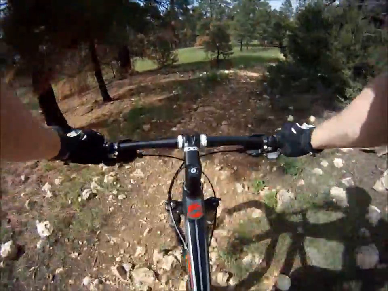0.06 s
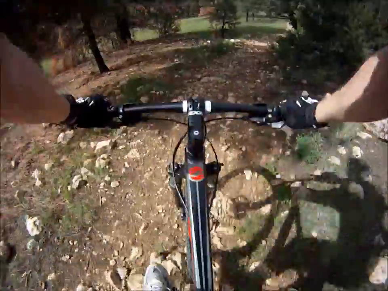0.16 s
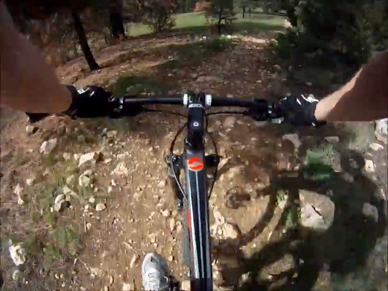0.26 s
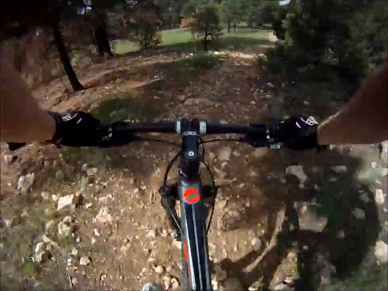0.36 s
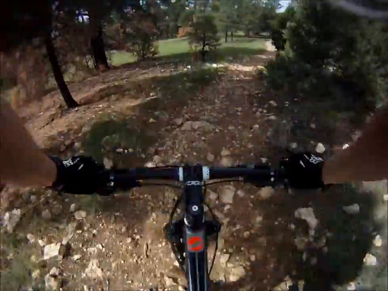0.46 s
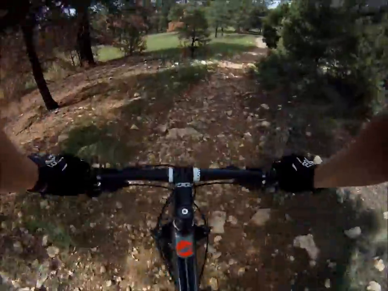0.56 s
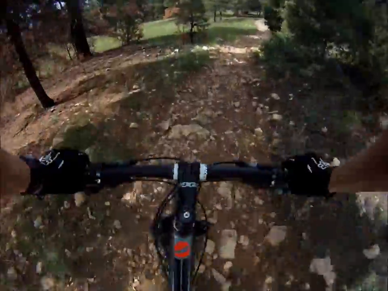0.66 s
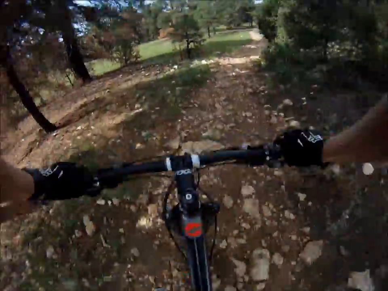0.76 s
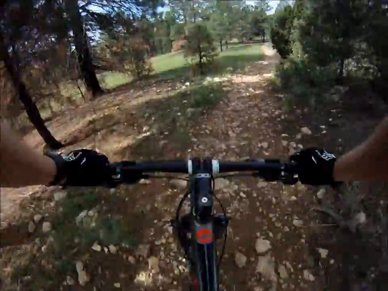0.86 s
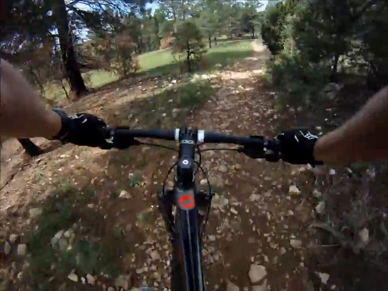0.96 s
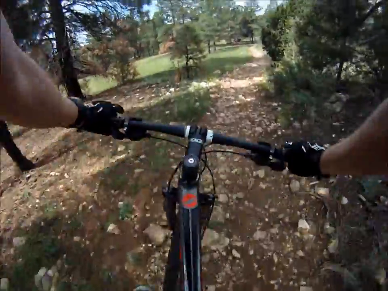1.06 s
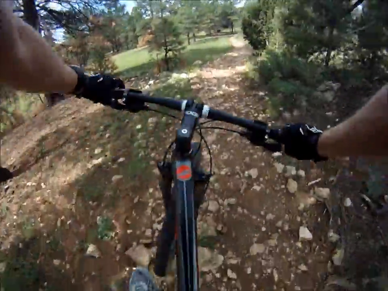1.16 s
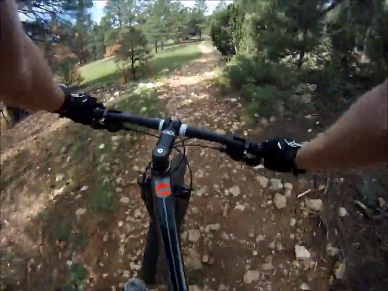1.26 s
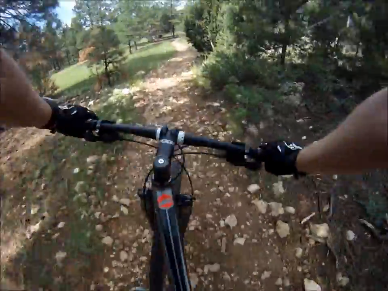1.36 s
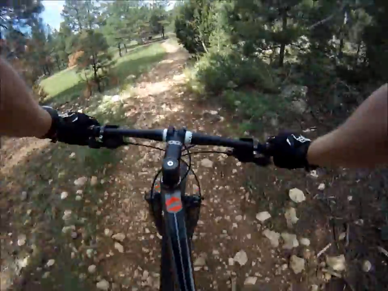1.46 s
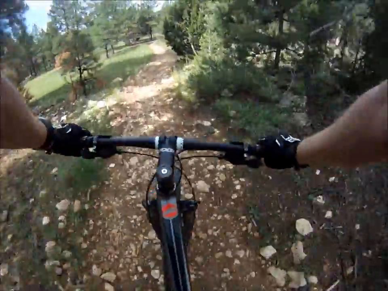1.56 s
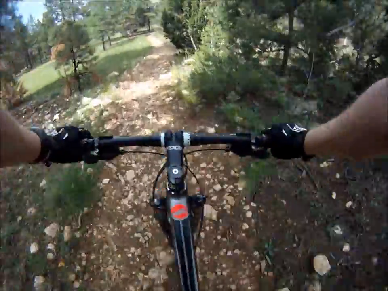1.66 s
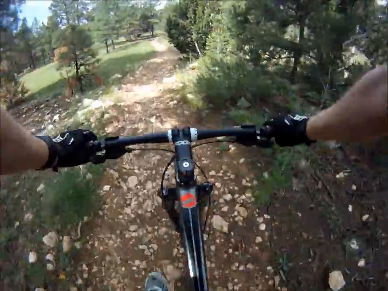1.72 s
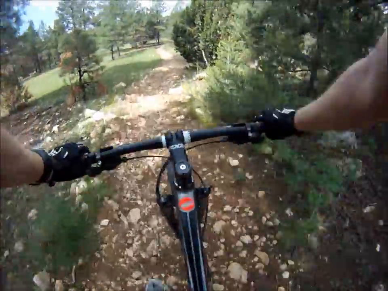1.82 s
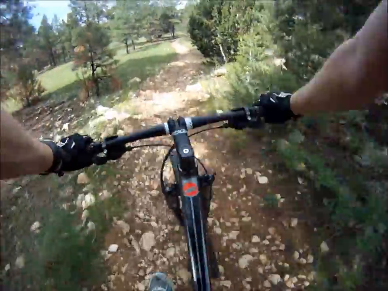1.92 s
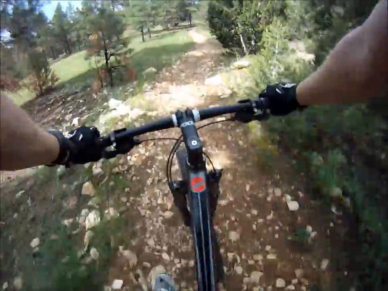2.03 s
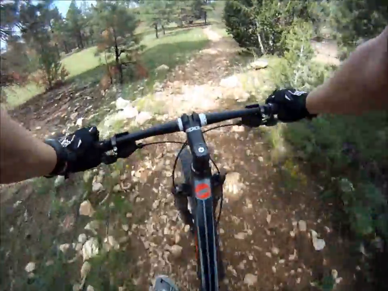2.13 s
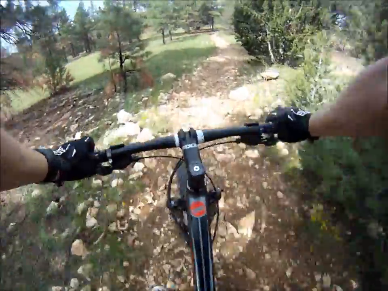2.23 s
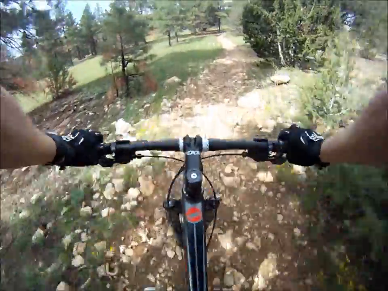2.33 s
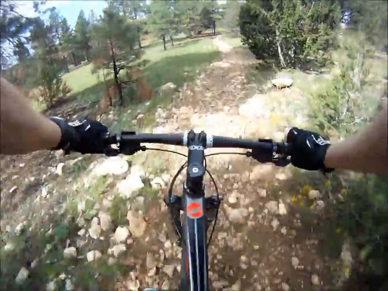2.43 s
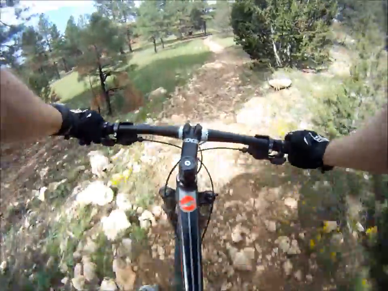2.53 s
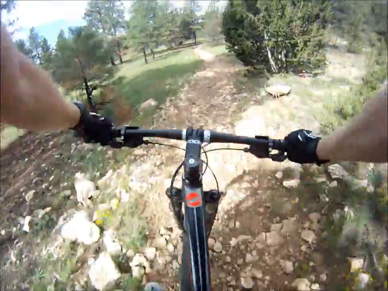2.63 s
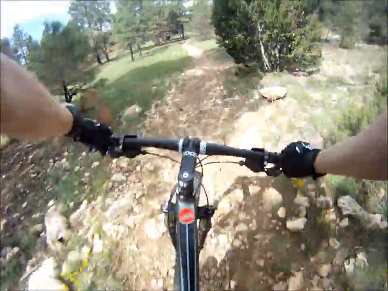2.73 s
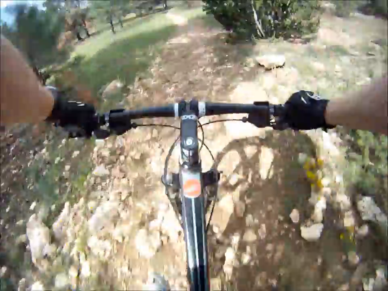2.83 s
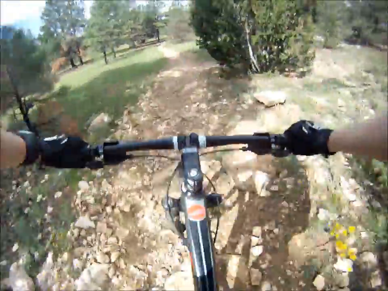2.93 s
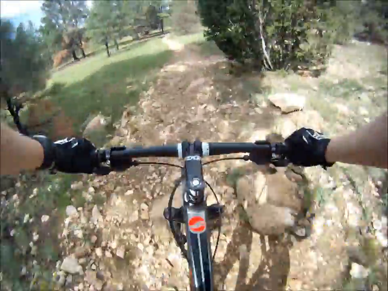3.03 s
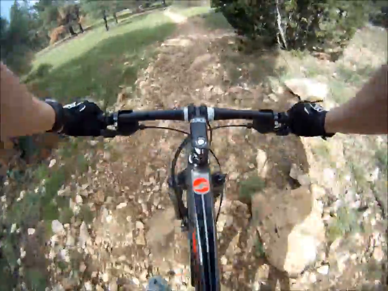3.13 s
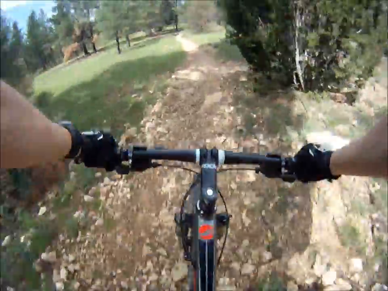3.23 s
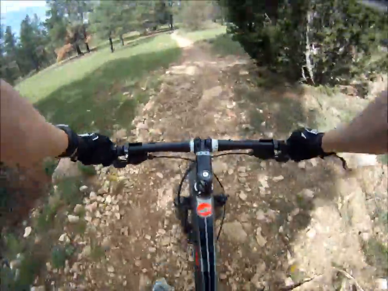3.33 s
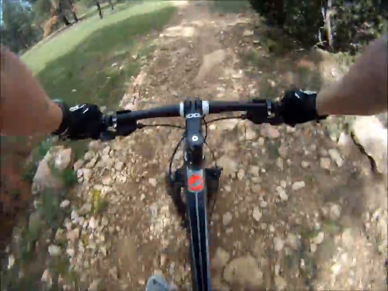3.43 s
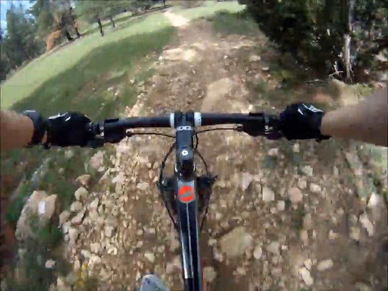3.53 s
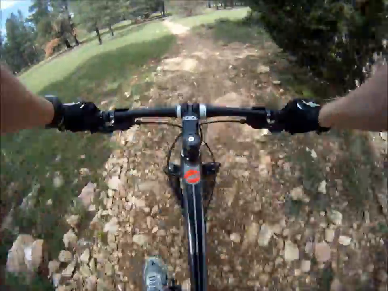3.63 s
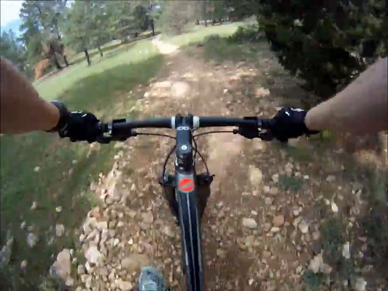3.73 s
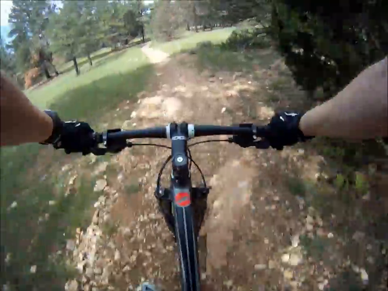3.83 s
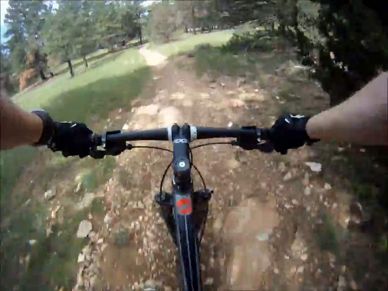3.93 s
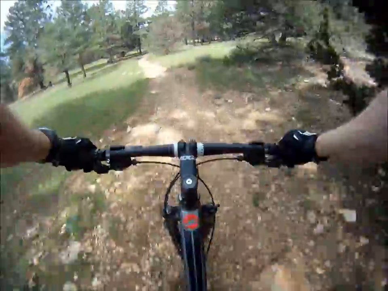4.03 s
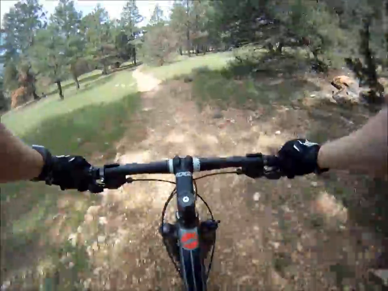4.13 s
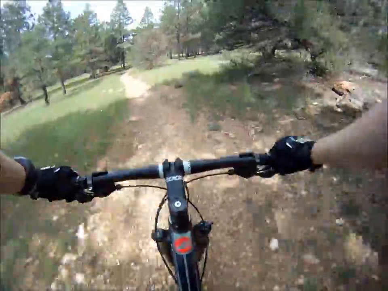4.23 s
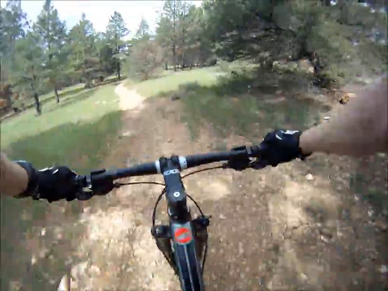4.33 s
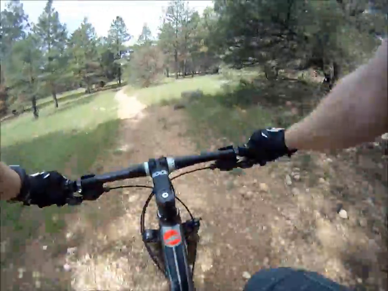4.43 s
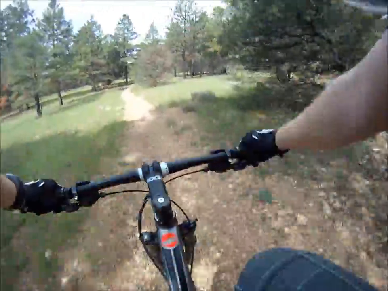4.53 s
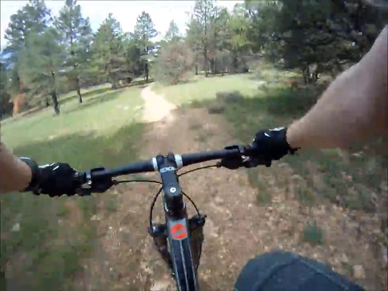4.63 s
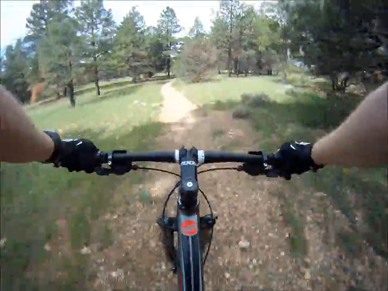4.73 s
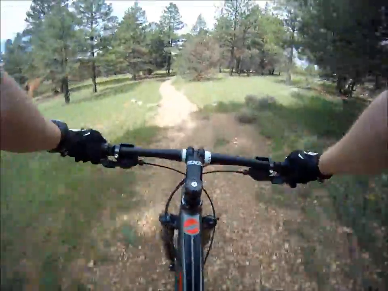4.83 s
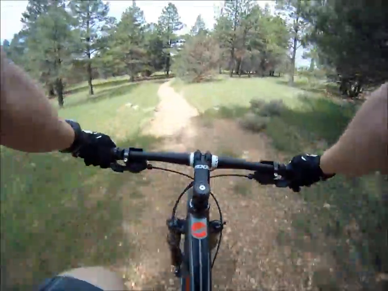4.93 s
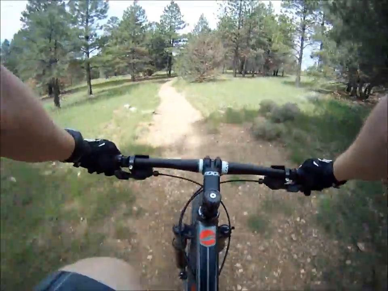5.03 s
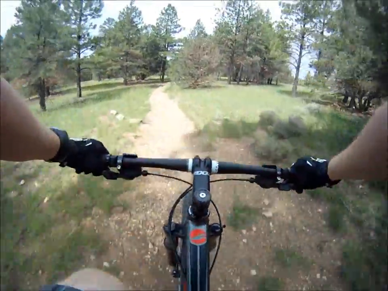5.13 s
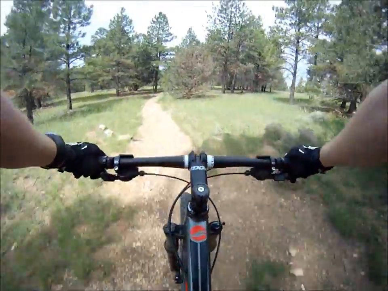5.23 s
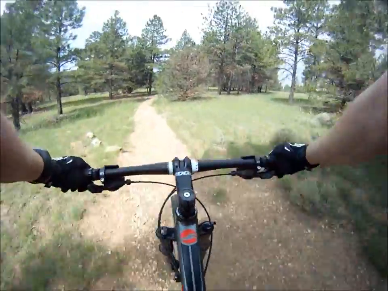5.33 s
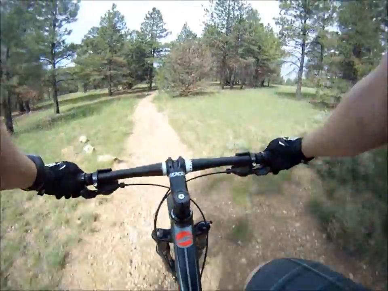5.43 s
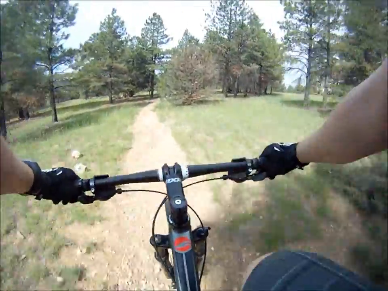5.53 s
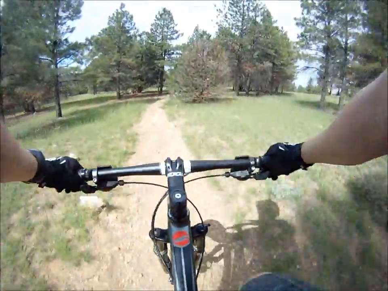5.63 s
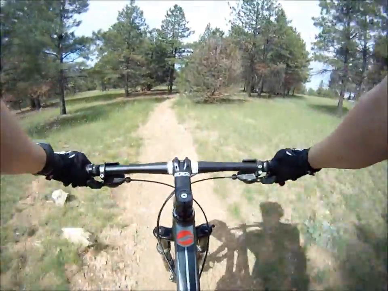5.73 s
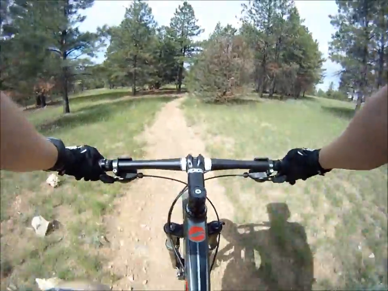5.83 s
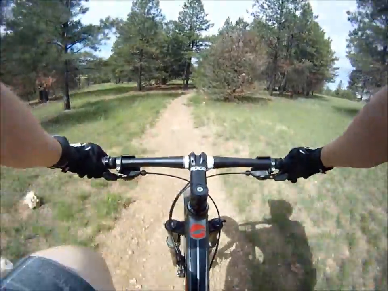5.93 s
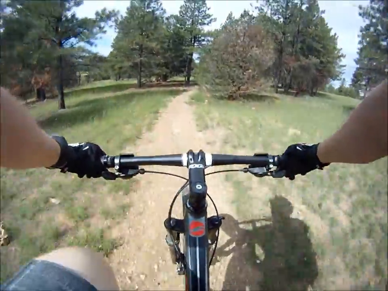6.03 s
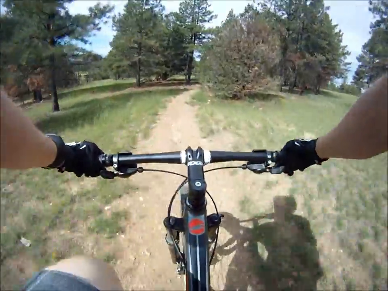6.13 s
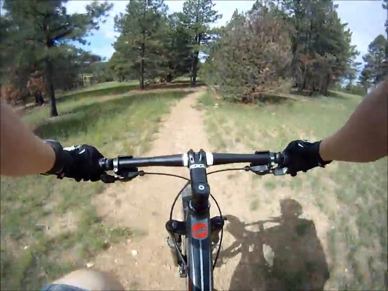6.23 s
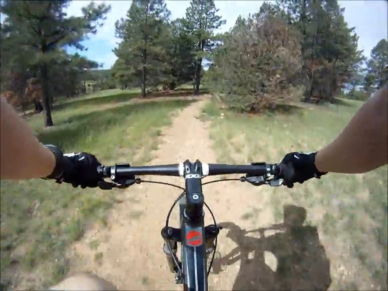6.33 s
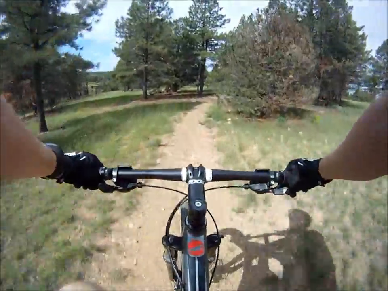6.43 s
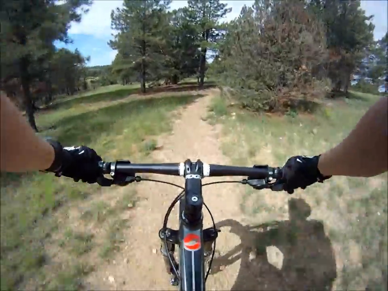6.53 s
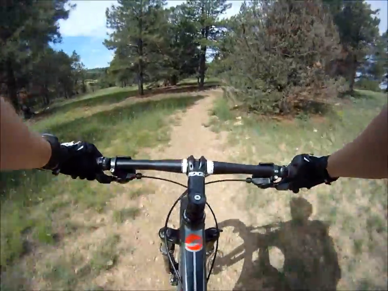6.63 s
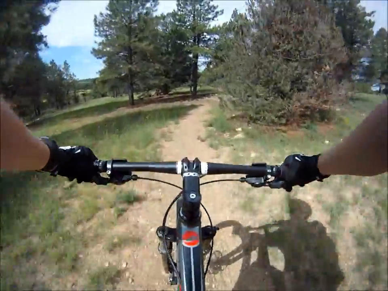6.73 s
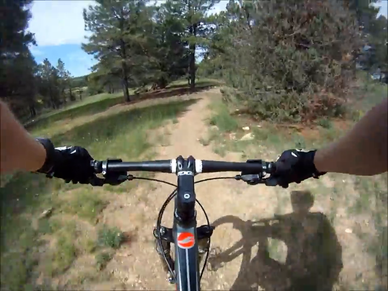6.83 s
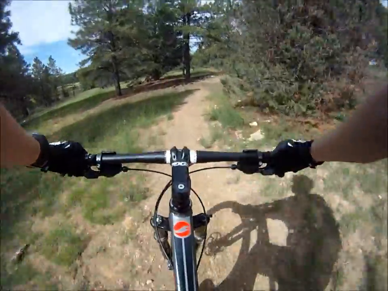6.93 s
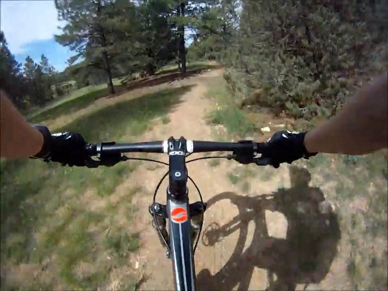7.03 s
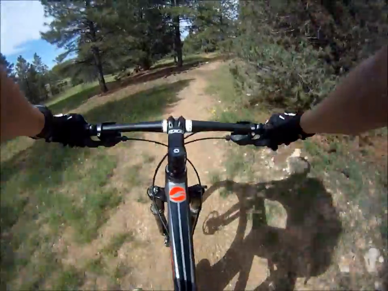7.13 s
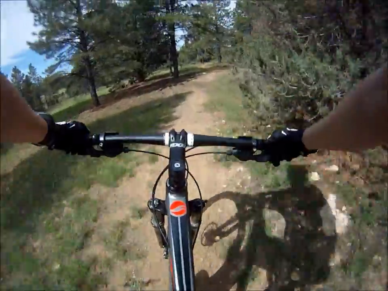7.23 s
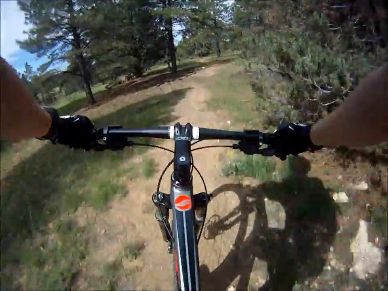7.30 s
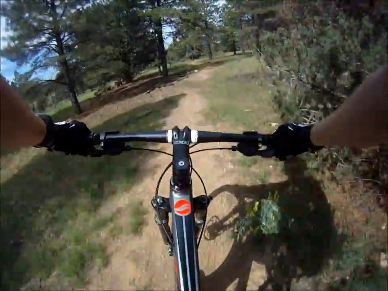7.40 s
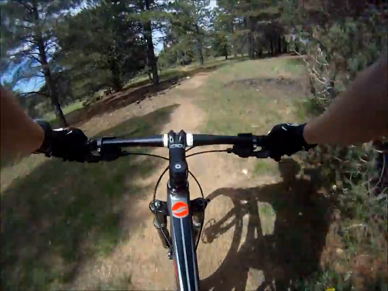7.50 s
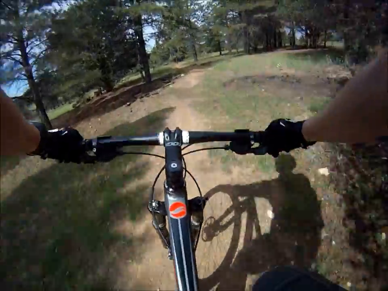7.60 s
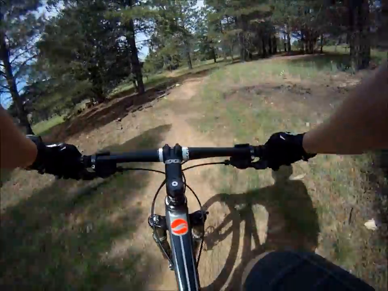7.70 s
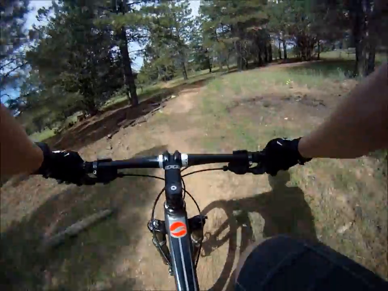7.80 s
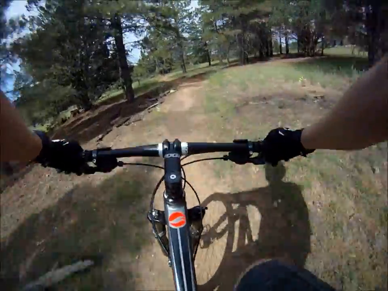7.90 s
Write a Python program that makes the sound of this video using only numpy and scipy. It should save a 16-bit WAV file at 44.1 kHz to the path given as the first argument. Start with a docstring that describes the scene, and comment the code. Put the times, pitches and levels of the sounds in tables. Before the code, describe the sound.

Hollow thuds, metallic chain rattle and sharp plastic clacks over gritty tyre noise give way to stone cracks and swelling, buffeting wind.

```python
"""A mountain bike runs down a stony dirt trail onto smoother ground, heard by a microphone in a case on the rider.
From the start rocks thud (ringing modes under a noise push), the chain slaps (bursts of clicks) and the
plastic mount knocks (chattering noise through hollow modes), over tyre hum and grit; the brake disc sings now and then.
The slaps and knocks thin out past halfway, where larger stones crack (scraping noise with broad resonances).
Wind, low shaped noise in gusts, grows towards the end."""
import sys
import numpy as np
from scipy import signal
from scipy.fft import rfft, irfft
from scipy.io import wavfile
from scipy.ndimage import uniform_filter1d

SR = 44100
rng = np.random.default_rng(int(sys.argv[2]) if len(sys.argv) > 2 else 0)


def transcribe(signal):
    """Save signal, clipped to [-1, 1], as a 16-bit WAV file at the path in sys.argv[1]."""
    frames = np.atleast_2d(signal).T
    limited = np.clip(frames, -1, 1)
    pcm = np.round(limited * 32767).astype(np.int16)
    wavfile.write(sys.argv[1], SR, pcm)


N = 351036
TIME = np.arange(N) / SR
AGE = np.arange(8192) / SR  # seconds since a blow

# spectrum of crushed grit and stone: freq_hz, relative level_db
GRIT_SPECTRUM = [(200, -7.5), (600, 14.5), (1150, 5), (1500, 6), (2900, 1), (4700, 4.5), (6000, -2),
                 (7100, -6.5), (8200, -11), (9050, -1), (12000, 14), (15000, -9.5)]
# ground under the tyres: time_s, relative hum_db, relative grit_db
GROUND_LEVELS = [(0.0, -40, -40.5), (0.31, -40, -45.5), (0.53, -36.5, -39.5), (0.82, -38.5, -35.5),
                 (1.24, -38.5, -43), (1.68, -38.5, -42), (2.04, -40.5, -46), (2.46, -35, -41),
                 (2.81, -36, -39.5), (3.12, -37, -36), (3.94, -30.5, -40), (4.23, -37.5, -40),
                 (4.77, -32, -42), (5.52, -39, -43), (6.74, -34, -41), (7.14, -35.5, -45),
                 (7.56, -39.5, -49.5), (7.96, -38.5, -39)]
STONY_FROM_S, STONY_TO_S = .2, 4.6  # then packed dirt with scattered pebbles
DIRT_BUMPS = 0.6  # bumpiness of the dirt, as a share of the stony stretch


def gain_of(db):
    """Decibels to amplitude."""
    return np.exp(np.asarray(db) * (np.log(10) / 20))


def evened(x):
    """Scales to an rms of 1."""
    return x / np.sqrt(np.mean(x ** 2) + 1e-20)


def sized(x, seconds):
    """Scales a burst to the energy that an rms of 1 has in the given time."""
    return x * np.sqrt(seconds * SR / (np.sum(x ** 2) + 1e-20))


def add(mix, s, sound):
    """Mixes a sound in at a time."""
    part = mix[max(round(s * SR), 0):][:len(sound)]
    part += sound[:len(part)]


def through(x, response):
    """Passes a sound through an impulse response."""
    return signal.oaconvolve(x, response)[:len(x)]


def level(curve, s, axis=1):
    """Reads a column of a level curve, in dB, at the given times."""
    rows = np.array(curve)
    return np.interp(s, rows[:, 0], rows[:, axis])


def colour(points, cased=False, size=4096):
    """Minimum-phase impulse response with a given spectrum, optionally heard through the case."""
    # what the case lets through: freq_hz, gain_db
    case_gains = [(1900, -8.5), (2400, -2.5), (2950, 4.5), (4100, -12), (5000, -12.5), (5700, -27),
                  (6350, -21.5), (7200, -3), (9200, -3), (10000, -22.5), (12000, -47), (14100, -13.5),
                  (15100, 4.5), (15600, -60)]
    # narrow resonances of the case: freq_hz, width_hz, peak_db
    case_peaks = [(1240, 66, 2.5), (10740, 58, 13), (13400, 180, -3)]
    hz = np.fft.rfftfreq(size, 1 / SR)
    db = np.zeros(len(hz))
    for table in [points, case_gains] if cased else [points]:
        table_hz, table_db = np.array(table).T
        db += np.interp(np.log(hz + 1), np.log(table_hz), table_db)
    if cased:
        for peak_hz, width_hz, peak_db in case_peaks:
            db += peak_db / (1 + (2 * (hz - peak_hz) / width_hz) ** 2)
    # folding the cepstrum makes the response causal
    cepstrum = irfft(np.log(gain_of(db)))
    cepstrum[1:size // 2] *= 2
    cepstrum[size // 2 + 1:] = 0
    return irfft(np.exp(rfft(cepstrum)))


def ring(modes, detune):
    """Sums dying sine modes; each blow finds them a little different."""
    hz, db, t60_s = np.transpose(modes)[:, :, None]
    hz = hz * (1 + detune * rng.standard_normal(hz.shape))
    decay = gain_of(db - 60 * AGE / t60_s)
    return (decay * np.sin(2 * np.pi * hz * AGE)).sum(0)


def wander(rate_hz):
    """Smooth random curve with a spread of 1."""
    hz = np.fft.rfftfreq(N, 1 / SR)
    smooth = rfft(rng.standard_normal(N)) * np.exp(-(hz / rate_hz) ** 2)
    return evened(irfft(smooth, N))


def grains(length, per_s, spread_db):
    """Randomly timed clicks: many small, a few large."""
    size = gain_of(spread_db * np.minimum(rng.exponential(1, length), 5))
    sign = rng.choice([-1, 1], length)
    return size * sign * (rng.random(length) < per_s / SR)


def mottled(x, patchy_db, size=512):
    """Colour that shifts from moment to moment, in patches some hundreds of Hz wide."""
    z = signal.stft(x, nperseg=size, noverlap=size * 3 // 4)[2]
    patches = uniform_filter1d(rng.standard_normal(z.shape[::-1]), size=7, axis=0)  # along time
    patches = evened(uniform_filter1d(patches, size=8, axis=1))  # along frequency
    return signal.istft(z * gain_of(patchy_db * patches.T), nperseg=size, noverlap=size * 3 // 4)[1][:N]


def scattered(start_s, end_s, db, colour_db, spread_db, count):
    """Light events strewn along a stretch of trail: rows of time_s, level_db, second_part_db."""
    place, strength, tint = rng.uniform(-1, 1, (count, 3)).T
    s = start_s + (end_s - start_s) * (np.arange(count) + .5 + place / 2) / count
    return list(zip(s, db + spread_db * strength, colour_db + 2 * spread_db * tint))


def wind(level_db=-2, gust_db=1.0, flutter_db=3.0):
    """Lumpy turbulence on the case: quick buffets and flutter ride on the slow gusts."""
    # wind spectrum: freq_hz, relative level_db
    wind_spectrum = [(10, -11), (28, -17.5), (55, 0.5), (95, 2), (145, -4.5), (220, -10.5), (400, -29),
                     (800, -48), (2000, -54), (5000, -71), (15000, -61), (15800, -90)]
    # slow gusts: time_s, relative level_db
    gust_levels = [(0, -48), (0.4, -34), (0.85, -45), (1.8, -46.5), (2.2, -34), (2.5, -46), (3.15, -41),
                   (3.42, -27), (3.85, -37.5), (4.05, -42.5), (4.4, -30.5), (4.7, -38), (4.95, -34),
                   (5.5, -36.5), (6.65, -24.5), (7.1, -28), (7.21, -24), (7.55, -17.5), (7.75, -29.5),
                   (7.96, -26)]
    swing_db = gust_db * wander(rate_hz=8.9) + flutter_db * wander(rate_hz=10)
    buffets = rng.standard_normal(N) * gain_of(swing_db)
    rumble = evened(through(buffets, colour(wind_spectrum)))
    return gain_of(level_db + level(gust_levels, TIME)) * rumble


def tyres(hum_db=3, grit_db=0, stones_db=-3.0, sway_db=-1.0, hum_swing_db=3.0, grit_swing_db=3.5, count=12):
    """Tread drums a hollow hum and crushes grit with the bumps, grinds pebbles and sways the microphone."""
    # hollow tyre hum: freq_hz, relative level_db
    hum_spectrum = [(100, -29.5), (250, -16), (315, -8.5), (357, 1.5), (400, -8.5), (470, -6), (540, -14.5),
                    (700, -24.5), (1200, -25), (2500, -66)]
    # low sway: freq_hz, relative level_db
    sway_spectrum = [(8, 6), (22, -5), (45, -3), (90, -16.5), (300, -68)]
    bumps = wander(rate_hz=35) * np.interp(TIME, [STONY_TO_S, STONY_TO_S + 1], [1, DIRT_BUMPS])
    hum = through(rng.standard_normal(N) * gain_of(hum_swing_db * bumps), colour(hum_spectrum))
    sway = through(rng.standard_normal(N), colour(sway_spectrum))
    rolling = gain_of(hum_db) * evened(hum) + gain_of(sway_db) * evened(sway)

    crunch = colour(GRIT_SPECTRUM, cased=True)
    grit = through(grains(N, per_s=7000, spread_db=3) * gain_of(grit_swing_db * bumps), crunch)
    stones = np.zeros(N)
    for crush_s in np.geomspace(.001, .007, count):
        hits = grains(N, per_s=14, spread_db=2.3)
        stones += through(hits, sized(pebble(crush_s, tone_db=10.5, count=2), seconds=1))
    ground = gain_of(grit_db) * evened(grit) + gain_of(stones_db) * evened(through(stones, crunch))
    # every patch of trail has its own mix of stone sizes
    ground = mottled(ground, patchy_db=2.5)
    hum_gain = gain_of(level(GROUND_LEVELS, TIME, axis=1))
    grit_gain = gain_of(level(GROUND_LEVELS, TIME, axis=2))
    return hum_gain * rolling + grit_gain * ground


def brake(rise_s=0.0026):
    """The disc grazes its pads and rings in a few dying modes."""
    # grazes: time_s, relative level_db
    grazes = [(0.70, -46), (3.267, -37), (3.545, -47), (4.447, -41.5)]
    # modes of the disc: freq_hz, relative level_db, t60_s
    disc_modes = [(2800, 9, 0.13), (4640, 6.5, 0.095), (7200, 4, 0.091)]
    out = np.zeros(N)
    for s, db in grazes:
        add(out, s, gain_of(db) * ring(disc_modes, detune=0.0018) * (1 - np.exp(-AGE / rise_s)))
    return out


def pebble(crush_s, tone_db=7, width=0.15, rise=0.15, count=3):
    """A few chips of one stone scrape in quick succession, each with a broad resonance at a random pitch."""
    hz, out = np.fft.rfftfreq(len(AGE), 1 / SR), np.zeros(len(AGE))
    swell = (1 - np.exp(-AGE / (rise * crush_s))) * np.exp(-AGE / crush_s)
    for chip in range(count):
        own_hz = np.exp(rng.uniform(np.log(600), np.log(9000)))
        resonance = 1 + gain_of(tone_db) / (1 + 2j * (hz - own_hz) / (width * own_hz))
        scrape = irfft(rfft(rng.standard_normal(len(AGE)) * swell) * resonance)
        add(out, chip * crush_s * rng.uniform(0, 2), sized(scrape, seconds=1) / (chip + 1))
    return sized(out, seconds=crush_s)


def crunches(crack_db=-11, body_db=-6, crush_s=0.0025, over_grit_db=15.0):
    """Larger stones give way with a bright crack and dull body; loose pebbles pop, louder with more grit."""
    # stones cracking under the tread: time_s, relative level_db, low_body_db
    large_stones = [(0.4993, -30, -22), (1.268, -27, -4), (2.158, -29, -15), (2.5202, -17, -24),
                    (4.0929, -20, -6), (4.2593, -17.5, -5), (4.33, -21.5, -22), (4.3573, -16, -11),
                    (4.7403, -25, 2), (4.848, -16, -6), (4.888, -19.5, 2), (5.226, -12.5, -29),
                    (5.558, -17, -14), (5.6378, -16.5, -32), (5.95, -15.5, -30), (6.127, -13.5, -24),
                    (6.344, -18.5, -21), (6.372, -31, 9), (6.432, -18.5, -30), (6.647, -14, -27),
                    (6.762, -18, -15), (6.802, -19.5, -4), (6.824, -21, -5), (7.907, -16.5, -28),
                    (7.9444, -24, -22)]
    out, crack = np.zeros(N), colour(GRIT_SPECTRUM, cased=True)
    body = colour([(300, -56), (750, 22), (1150, 18), (1700, -1.5), (3000, -25)])
    pops = scattered(STONY_FROM_S, end_s=7.6, db=over_grit_db, colour_db=-8, spread_db=3.5, count=90)
    pebbles = [(s, db + level(GROUND_LEVELS, s, axis=2), low_db) for s, db, low_db in pops]
    for s, db, low_db in large_stones + pebbles:
        scrape = pebble(crush_s, tone_db=5)
        stone = gain_of(crack_db) * sized(through(scrape, crack), seconds=0.0029)
        stone += gain_of(body_db + low_db) * sized(through(scrape, body), seconds=0.0013)
        add(out, s, gain_of(db) * stone)
    return out


def chain(jingle_db=-7.5, stay_db=-3, steel_db=-15, rise_s=0.00057, link_db=0, link_t60_s=0.014,
          light_settle_s=0.0035, count=24):
    """Links land one after another on the frame with short rings; steel rings on; light slaps fall on stony ground."""
    # hard slaps: time_s, relative level_db, frame_ring_db, settle_s
    hard_slaps = [(0.231, -31, -1, .0044), (0.2917, -23.5, 0.5, 0.0082), (0.3586, -22.5, 2, 0.011),
                  (0.3751, -24, 2, 0.027), (0.5666, -25.5, 2, 0.028), (0.6172, -22, -0.5, 0.012),
                  (0.6604, -19, -11, 0.0032), (0.6797, -8, -5, 0.0065), (0.6931, -10.5, -9, 0.0058),
                  (0.7857, -14.5, -3.5, 0.0071), (0.81, -15.5, -2, 0.0079), (0.9066, -27, -1, 0.011),
                  (1.1391, -23, -3.5, 0.016), (1.42, -16.5, -7, 0.0047), (1.652, -27, -3, .017),
                  (1.7042, -12.5, -1, 0.0089), (1.7484, -12.5, -8.5, 0.007), (1.782, -16.5, -6, 0.004),
                  (1.845, -20, -1, 0.0078), (2.067, -21.5, -3, 0.0057), (2.5472, -26, 0, 0.0086),
                  (2.747, -20.5, -12, 0.0072), (2.8625, -18.5, -6.5, 0.012), (2.918, -15.5, -33, 0.011),
                  (2.952, -13.5, -9, 0.0088), (2.9642, -11, -3.5, 0.0087), (3.0168, -11, -7, 0.012),
                  (3.03, -15, -1, .0043), (3.0785, -13, -3.5, 0.0038), (3.128, -21, -13, 0.0098),
                  (3.2101, -12.5, -4, 0.0049), (3.2864, -21, -12, 0.014), (3.381, -20.5, -8, .009),
                  (3.4555, -15, -6, 0.013), (3.5313, -4.5, -14, 0.0068), (3.5563, -11, -5, 0.009),
                  (3.588, -22, -9, 0.0072), (3.6669, -24, -4, 0.036), (3.7742, -23, -14, 0.015),
                  (3.7984, -22, 4, 0.002), (3.851, -21.5, -7, 0.0078), (3.8967, -23.5, -15, 0.025),
                  (4.0065, -16, -2, 0.0071), (4.1027, -28, -4, 0.018), (5.146, -27, -1, 0.013)]
    # spectrum of the jingle: freq_hz, relative level_db
    jingle_spectrum = [(300, -1), (800, 2.5), (1200, -5.5), (2500, -19.5), (4500, 12), (6300, 4),
                       (7600, -4), (9200, -1.5), (11000, 22), (15000, -5)]
    # modes of chain and sprockets: freq_hz, relative level_db, t60_s
    steel_modes = [(2566, 31.5, 0.12), (2790, -30, .06), (3230, 25, 0.076), (3648, 28.5, 0.064),
                   (4400, 25, 0.033), (4880, -19, .06), (7150, 5.5, 0.032), (8150, -21, .06),
                   (8900, 19, 0.15)]
    out, links = np.zeros(N), colour(jingle_spectrum, cased=True)
    stay = colour([(1200, -37), (2200, -18.5), (2850, 2), (3400, -15.5), (4500, -12), (7000, -69)])
    light = scattered(STONY_FROM_S, STONY_TO_S, db=-28.5, colour_db=-8, spread_db=4.5, count=20)
    for s, db, ring_db, settle_s in hard_slaps + [(*row, light_settle_s) for row in light]:
        landing = (1 - np.exp(-AGE / rise_s)) * np.exp(-AGE / settle_s)
        clicks = grains(len(AGE), per_s=4400, spread_db=2.5) * landing
        tinkle = ring([(hz, 0, link_t60_s) for hz in rng.uniform(2106, 9540, count)], detune=0)
        metal = evened(clicks) + gain_of(link_db) * evened(through(clicks, tinkle))
        slap = gain_of(jingle_db) * evened(through(metal, links))
        slap += gain_of(stay_db + ring_db) * evened(through(clicks, stay))
        slap += gain_of(steel_db) * evened(through(clicks, ring(steel_modes, detune=0.0004)))
        # longer slaps carry more energy
        add(out, s, gain_of(db) * slap * np.sqrt(settle_s / AGE[-1]))
    return out


def knocks(tap_hz=1140, clack_db=1, crack_db=0, chatter_s=0.003, first_db=9, tail_db=-21, tail_s=0.0083):
    """Loose plastic meets, chatters briefly and rings the hollow case; light taps fall between hard knocks."""
    # hard knocks of the mount: time_s, relative clack_db, crack_db over the clack, pitch_hz
    hard_knocks = [(0.035, -6, 2.5, 1130), (0.133, -16, -1.5, 1160), (0.265, -26.5, -27, 1160),
                   (0.375, -17.5, 5.5, 1030), (0.415, -12, -1.5, 1150), (0.461, -21, -18, 1050),
                   (0.592, -19.5, 4.5, 950), (0.61, -11.5, -4, 1180), (0.825, -16.5, -8, 1150),
                   (0.834, -20, -17, 1110), (0.965, -13.5, -3, 1137), (1.071, -34, 13, 1330),
                   (1.124, -11.5, -4.5, 1160), (1.148, -13.5, -4, 1120), (1.352, -14, 1.5, 1160),
                   (1.361, -19, -6, 1140), (1.442, -14, -12.5, 1160), (1.596, -20.5, -9, 1140),
                   (2.03, -24, 2.5, 1130), (2.235, -15, 1, 1170), (2.423, -21, -13, 1160),
                   (2.499, -19.5, -3.5, 980), (2.57, -22.5, -9, 1140), (2.678, -9.5, 2, 1140),
                   (2.839, -10.5, -7, 1150), (2.986, -14, -6, 1110), (3.148, -3.5, -1.5, 1140),
                   (3.175, -12, -6, 1210), (3.23, -16.5, -13, 1210), (3.256, -31.5, 10.5, 1150),
                   (3.333, -15.5, -7.5, 1170), (3.434, -20, -4, 1030), (3.8, -19.5, 4, 1010),
                   (3.851, -21, -7, 1100), (4.391, -18.5, -3, 1140), (4.623, -20.5, -8.5, 1170),
                   (4.651, -21.5, -2.5, 1120), (4.824, -23.5, -4, 1130), (4.867, -21.5, -6.5, 1150),
                   (4.981, -20.5, -17, 1130), (5.068, -21.5, -8.5, 1110), (5.472, -22, -4, 1060),
                   (6.097, -26.5, -4.5, 1130), (7.876, -20.5, -8.5, 1120)]
    # modes of the case: multiple of the pitch, relative level_db, t60_s
    clack_modes = [(.66, -8, .018), (.86, -10.5, 0.017), (1, 7, 0.021), (1.4, -9, 0.025)]
    # spectrum of the sharp crack: freq_hz, relative level_db
    crack_spectrum = [(500, -24.5), (1100, 0.5), (1600, 10.5), (2200, 8.5), (3200, 10), (4500, 7.5),
                      (6000, 1), (7500, -5.5), (11000, 15), (16000, -5)]
    out, snap = np.zeros(N), colour(crack_spectrum, cased=True)
    # the chatter stops abruptly, leaving a faint tail
    contact = np.exp(-(AGE / chatter_s) ** 2) + gain_of(tail_db) * np.exp(-AGE / tail_s)
    light = scattered(STONY_FROM_S, STONY_TO_S, db=-34, colour_db=-3, spread_db=3.5, count=18)
    for s, db, sharp_db, pitch_hz in hard_knocks + [(*row, tap_hz) for row in light]:
        chatter = contact * rng.standard_normal(len(AGE))
        chatter[0] = gain_of(first_db)  # first contact
        modes = [(multiple * pitch_hz, mode_db, t60_s) for multiple, mode_db, t60_s in clack_modes]
        clack = sized(through(chatter, ring(modes, detune=0.015)), seconds=0.0015)
        crack = sized(through(chatter, snap), seconds=0.0049)
        add(out, s, gain_of(db) * (gain_of(clack_db) * clack + gain_of(crack_db + sharp_db) * crack))
    return out


def rocks(thud_db=-5, jolt_db=-2, jolt_s=0.012, boom_db=4, boom_t60_s=0.029):
    """A tyre booms over a rock: frame and wheels ring, and the shock shakes the microphone."""
    # wheel hits: time_s, relative thud_db, jolt_db over the thud, contact_s, boom_hz
    hits = [(0.176, -20, -24, 0.027, 339), (0.294, -17.5, -13, 0.0029, 338), (0.366, -11, -22, 0.0066, 345),
            (0.383, -9, -28, 0.026, 348), (0.567, -12, -27, 0.013, 355), (0.609, -17.5, -4, .0033, 553),
            (0.623, -15, -7, 0.0065, 388), (0.681, -11.5, -24, 0.0048, 501),
            (0.756, -20.5, -18, 0.0033, 395), (0.852, -9.5, -28, 0.0027, 335),
            (0.861, -21, -19, .0044, 302), (1.125, -23, -4, 0.0059, 417), (1.438, -9, -37, 0.0072, 350),
            (2.019, -15, -11, 0.02, 340), (2.53, -17, -21, .0057, 342), (2.643, -22.5, 1, .0045, 330),
            (2.777, -21.5, -15, .0062, 363), (3.045, -12, -36, 0.012, 363), (3.431, -12, -18, 0.03, 358),
            (3.78, -7.5, -33, 0.012, 350), (3.797, -8.5, -16, 0.0083, 350), (3.865, -12.5, -13, .0063, 382),
            (4.279, -15, -11, 0.0085, 361), (4.851, -15.5, -28, 0.0039, 360),
            (6.242, -21.5, -6, .0063, 355), (6.6, -15, -14, .0045, 450)]
    # modes of frame and wheels: freq_hz, relative level_db, t60_s
    frame_modes = [(365, 14, 0.087), (442.4, 12.5, 0.087), (543, 10.5, 0.03), (744, 4.5, 0.066)]
    # deep jolt: freq_hz, relative level_db
    jolt_spectrum = [(15, 22), (45, 36), (80, 25), (150, 10), (260, 20), (800, -147)]
    # push of a tyre on a rock: freq_hz, relative level_db
    push_spectrum = [(80, -24), (190, -14), (330, -7), (700, -11.5), (1500, -3), (4000, -21)]
    out, shake, rubber = np.zeros(N), colour(jolt_spectrum), colour(push_spectrum)
    for s, db, deep_db, contact_s, boom_hz in hits:
        scrub = rng.standard_normal(len(AGE))
        push = through(scrub * np.exp(-AGE / contact_s), rubber)
        body = ring(frame_modes, detune=0.039) + ring([(boom_hz, boom_db, boom_t60_s)], detune=0)
        thud = sized(through(push, body), seconds=0.0071)
        jolt = sized(through(scrub * np.exp(-AGE / jolt_s), shake), seconds=0.02)
        add(out, s, gain_of(db) * (gain_of(thud_db) * thud + gain_of(jolt_db + deep_db) * jolt))
    return out


def scene():
    """Sums the sources, all close and in the open air, as one channel."""
    return (wind() + tyres() + brake() + crunches() + chain() + knocks() + rocks())[None]


def record(dry, sizzle_db=-27, ceiling=1.0):
    """A faint sizzle near 12 kHz follows the low sound; peaks over the ceiling clip; then the band limit."""
    low = through(dry[0], colour([(60, -24), (200, 2.5), (360, 2.0), (700, 11.5), (1500, 12)]))
    carrier = np.cos(2 * np.pi * 12000 * TIME)
    clipped = np.clip(dry + gain_of(sizzle_db) * low * carrier, -ceiling, ceiling)
    low_pass = signal.firwin(255, 16300, window=("kaiser", 8), fs=SR)  # edge in Hz
    return signal.oaconvolve(clipped, low_pass[None], "same")


dry = scene()
out = record(dry)
transcribe(out)
```